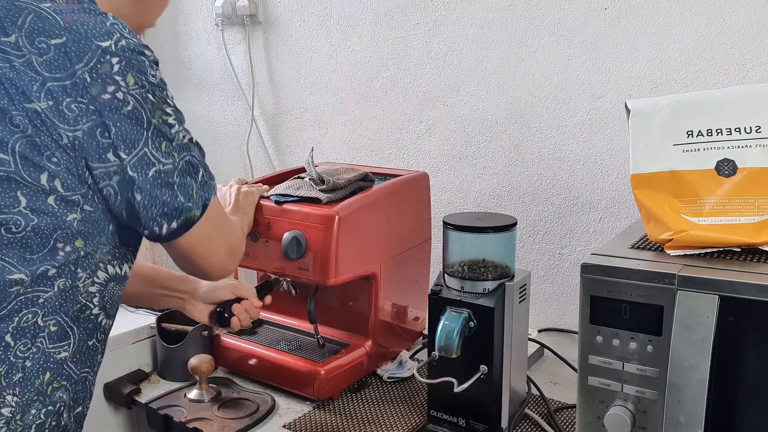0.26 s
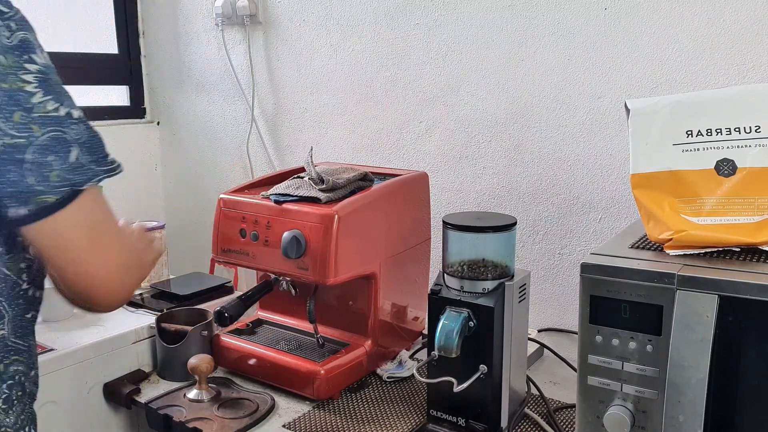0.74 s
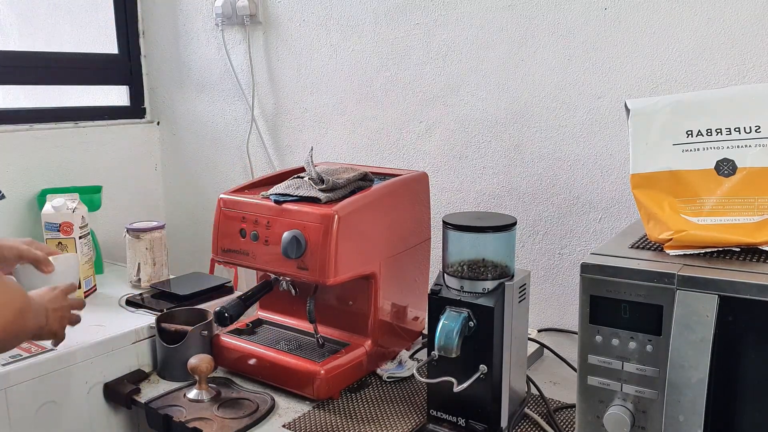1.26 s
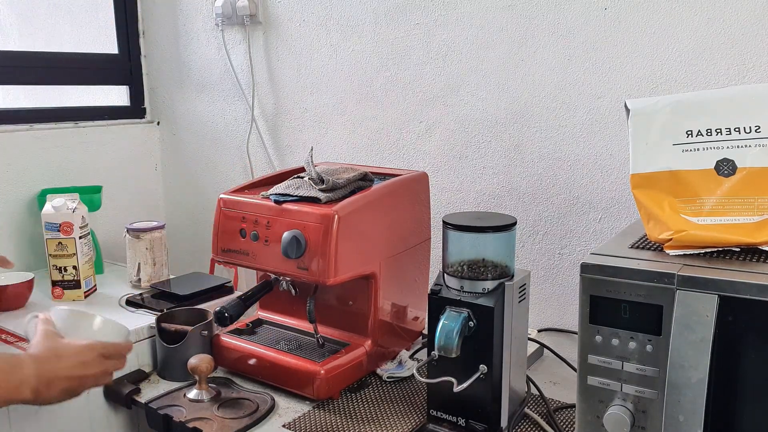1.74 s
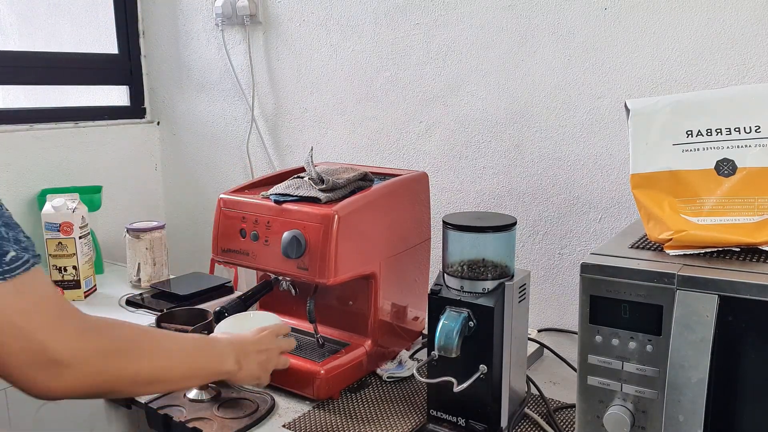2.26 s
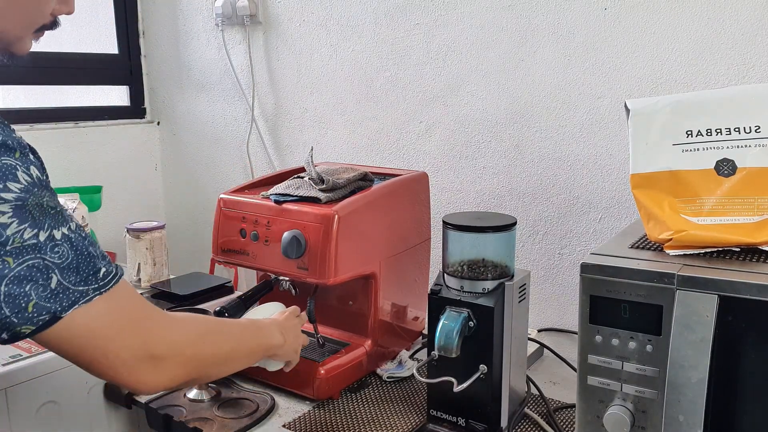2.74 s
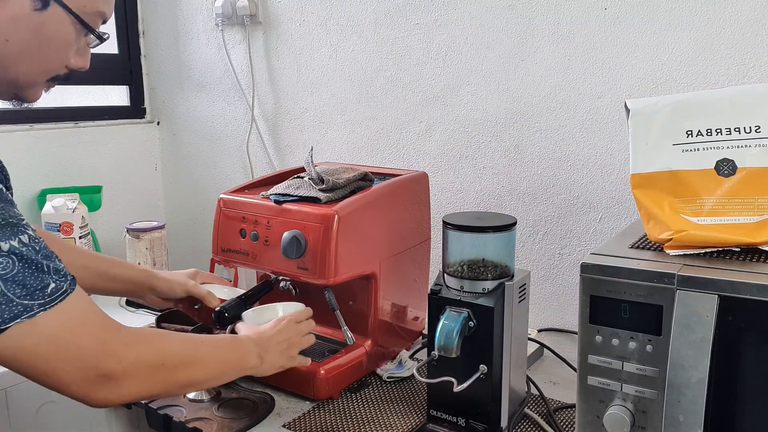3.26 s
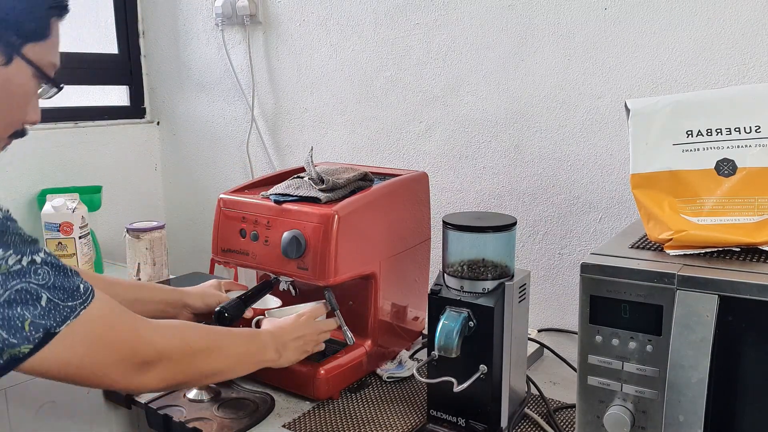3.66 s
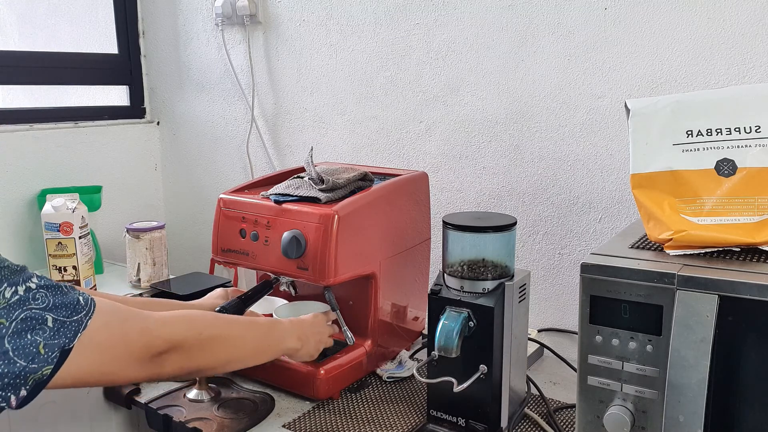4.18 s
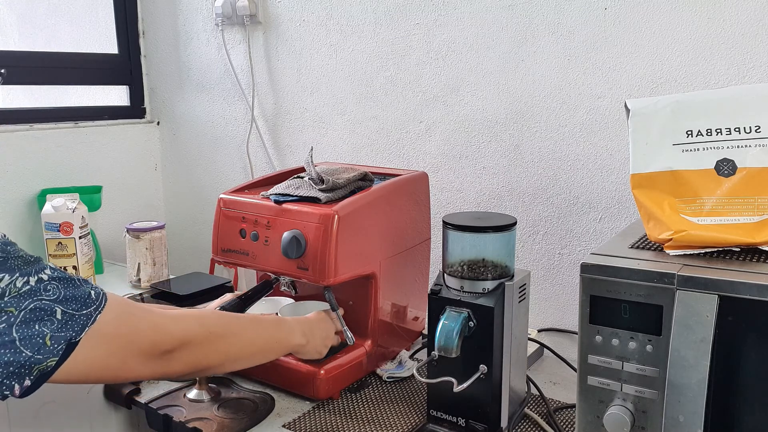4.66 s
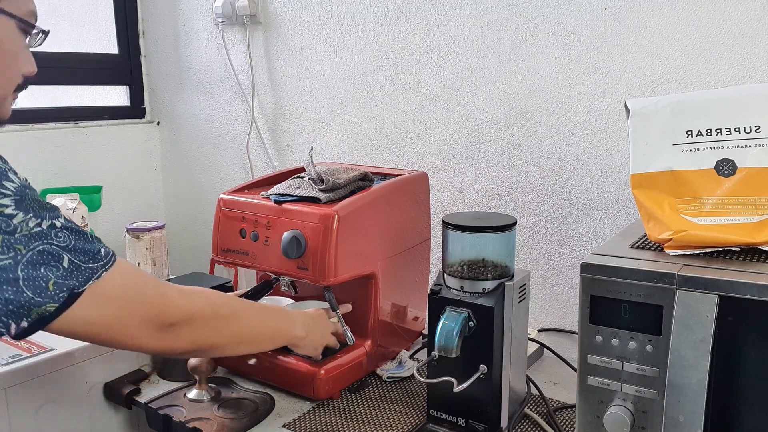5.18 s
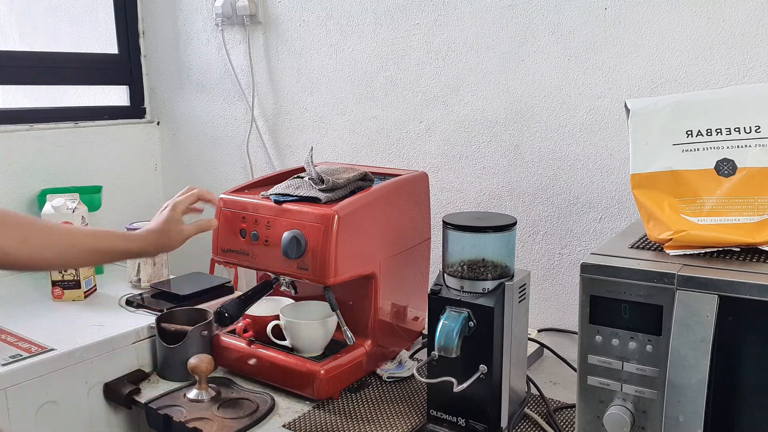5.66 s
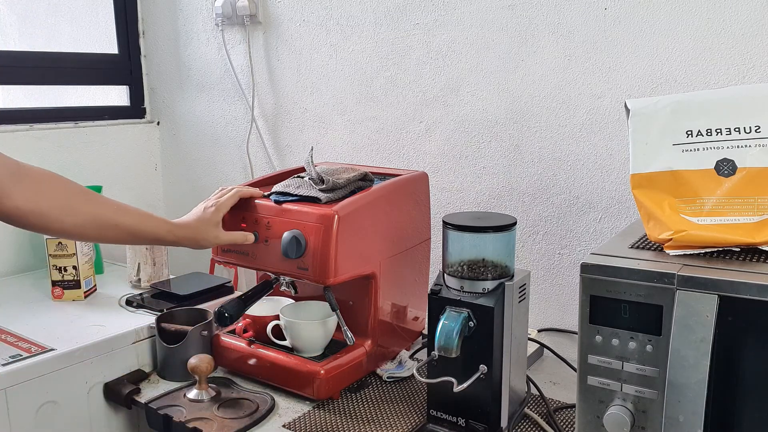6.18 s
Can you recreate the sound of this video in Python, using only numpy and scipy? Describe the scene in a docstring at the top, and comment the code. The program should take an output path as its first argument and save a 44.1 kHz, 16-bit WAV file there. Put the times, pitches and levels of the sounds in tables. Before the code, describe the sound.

A steady low room rumble with a very faint hum fills a small, hard-walled kitchen, heard by close stereo microphones. From 0.2 to 0.7 seconds, quiet dull bumps and short gritty rubs come from a filter holder being twisted tight, mixed with faint sole scrapes. Small shuffles continue around 1.1, 1.8 and 2.2, with a tiny tick near 0.9. Soft thuds at 2.8 to 2.9 precede a longer, hissing shoe slide from 3.2 to 3.5. At 3.5 a strong, hollow double knock lands, followed by lower knocks at 3.6 and 3.75 and gritty ceramic sliding. A bright double cup clink with a thump rings at 4.1. Muffled bumps and slides follow at 4.4, then lighter paired clinks at 4.7 and 5.0, the latter more ringing. Shoes scuff between 5.35 and 5.75; one faint thud at 5.8 leaves quiet rumble.

```python
"""Readying an espresso machine

In a small, hard-walled kitchen the filter holder is twisted tight, feet shuffle, and two ceramic cups
are bumped onto the drip tray, slid into place and clinked in three quick pairs of contacts.
Knocks, clinks and ticks are dying modes and coloured room echoes; slides are gritty noise shaped by
sliding speed; room tone is coloured noise with a faint hum."""
import sys
import numpy as np
from scipy import signal
from scipy.fft import rfft, irfft, next_fast_len
from scipy.io import wavfile
from scipy.ndimage import uniform_filter1d

SR = 44100
rng = np.random.default_rng(int(sys.argv[2]) if len(sys.argv) > 2 else 0)


def persist_wave(psi):
    """Save psi, clipped to +-1, as 16-bit WAV."""
    counts = np.round(np.clip(psi, -1, 1) * 32767).astype(np.int16)
    wavfile.write(sys.argv[1], SR, np.atleast_2d(counts).T)


N = 283111
RING = np.arange(32768) / SR  # time axis of short sounds (s)
LEAD_S = 4 / SR  # sound reaches the left microphone this much earlier


def amp(db):
    """Decibels to gain."""
    return 10 ** (np.asarray(db) / 20)


def unit(x):
    """Scales to an rms of one."""
    return x / np.sqrt(np.mean(x ** 2) + 1e-20)


def blow(x):
    """Scales each channel of a short sound to the energy of a tenth of a second at rms one."""
    return x / np.sqrt(np.sum(x ** 2, -1, keepdims=True) * 10 / SR + 1e-20)


def read(points, hz):
    """Joins points by straight lines on a log-frequency axis."""
    point_hz, value = np.transpose(points)
    return np.interp(np.log(hz + 1), np.log(point_hz), value)


def add(mix, start_s, sound):
    """Mixes a stereo sound in at a given time."""
    part = mix[:, round(start_s * SR):][:, :sound.shape[1]]
    part += sound[:, :part.shape[1]]


def band(x, hz, kind, order=2):
    """Butterworth filter."""
    sos = signal.butter(order, np.minimum(hz, SR / 2 - 100), kind, fs=SR, output="sos")
    return signal.sosfilt(sos, x)


def colour(x, spectrum, patchy_db=0):
    """Minimum-phase filter with the given spectrum, randomly rippled like many small resonances."""
    hz = np.fft.rfftfreq(len(RING), 1 / SR)
    smoother = signal.windows.hann(len(RING) // 320)
    ripple = unit(signal.fftconvolve(rng.standard_normal(len(hz)), smoother, "same"))
    db = read(spectrum, hz) + patchy_db * ripple * np.minimum(hz / 1500, 1)  # smoother in the bass
    log_gain = np.log(amp(np.r_[db, db[-2:0:-1]]))
    response = np.fft.ifft(np.exp(signal.hilbert(log_gain).conj())).real
    taps = response[:len(RING) // 8]
    return signal.fftconvolve(x, taps[None], axes=1)[:, :x.shape[1]]


def diffuse(size):
    """Noise from all sides at two close microphones: alike in the bass, nearly unrelated in the treble."""
    # (frequency [Hz], left-right correlation)
    correlation = [(60, 0.93), (150, 1), (300, 0.75), (640, 0.5), (1400, 0), (3000, 0.087), (15000, 0)]
    n = next_fast_len(size)
    mid, side = rfft(rng.standard_normal((2, n)))
    alike = np.clip(read(correlation, np.arange(len(mid)) * SR / n), -1, 1)
    mid = mid * np.sqrt(1 + alike)
    side = side * np.sqrt(1 - alike)
    return unit(irfft([mid + side, mid - side], n)[:, :size])


def room(direct=0.18, late_db=-8.5, early_s=.045):
    """Kitchen impulse response: direct click, plateau of wall echoes, lower tail dying band by band."""
    # reverberation: (frequency [Hz], t60 [s])
    room_t60 = [(150, 0.61), (400, 0.54), (1040, 0.42), (2760, 0.46), (7280, 0.32), (15000, 0.29)]
    hz, t, z = signal.stft(diffuse(len(RING)), SR, nperseg=256)
    late = np.clip(2 * t / early_s - 1, 0, 1)
    decay_db = 60 * np.maximum(t - early_s / 2, 0) / read(room_t60, hz)[:, None]
    tail = signal.istft(z * amp(late * late_db - decay_db), SR)[1][:, :len(RING)]
    tail /= np.linalg.norm(tail[0])
    tail[[0, 1], [0, round(LEAD_S * SR)]] += direct
    return tail


def ring(hz, db, t60, pan_db=0, wet=1):
    """Exponentially dying modes, one row each, heard straight and through the room."""
    hz, db, t60, pan_db = (np.reshape(c, (-1, 1, 1)) for c in (hz, db, t60, pan_db))
    t = np.maximum(RING - [[0], [LEAD_S]], 0)
    modes = np.sin(2 * np.pi * hz * t) * np.exp(-np.log(1000) * t / t60)
    modes[::2] *= -1  # neighbouring modes start in opposite directions
    echoes = signal.fftconvolve(modes[:, :1], room()[None], axes=2)[..., :len(RING)]
    gain = amp(db + pan_db * np.array([[.5], [-.5]]))
    return gain * blow(blow(modes) + wet * blow(echoes))


def friction(grain_db):
    """Noise made uneven by tiny slips about a millisecond long."""
    slips = unit(uniform_filter1d(rng.standard_normal(N), size=50))
    return diffuse(N) * amp(grain_db * slips)


def stroke(start_s, rise_s, glide_s, db, release_t60, speed_power=1.53):
    """Gain of one slide: friction grows as a power of speed; after the stop it dies away in the room."""
    t = np.arange(N) / SR - start_s
    speed = np.sin(np.pi / 2 * np.clip(t / rise_s, 0, 1))
    stopped_s = np.maximum(t - rise_s - glide_s, 0)
    return amp(db) * speed ** speed_power * np.exp(-np.log(1000) * stopped_s / release_t60)


def slides(rows, release_t60):
    """Gain over time of several slides, whose powers add."""
    return np.sqrt(sum(stroke(*row, release_t60) ** 2 for row in rows))


def knocks(thud_db=0, lowest_hz=80, pan_db=-0.6, spot_db=2):
    """Each knock is voiced by the same body and counter modes; softness is a lower treble corner."""
    # blows on the machine, and a foot landing at 3.303, all voiced by the same body and counter modes:
    # (time [s], level [dB], low-pass corner set by hardness [Hz], counter boom [dB])
    knock_rows = [(.178, -47, 2400, -3), (.229, -51.5, 1500, -6.5), (.246, -48, 1700, 2.5),
                  (0.305, -48, 250, -31), (.39, -44, 230, -4), (.56, -51.5, 507, 3.5),
                  (.713, -54.5, 680, -2.5), (2.829, -49, 238, -7), (2.903, -49, 189, -2.5),
                  (3.303, -52.5, 464, -8), (3.502, -27.5, 1680, -7), (3.509, -24, 1110, -10.5),
                  (3.578, -30.5, 517, 2), (3.744, -28.5, 450, 0.5), (3.934, -40.5, 120, -19),
                  (3.997, -38, 180, -17), (4.075, -30, 305, -2.5), (4.366, -45.5, 124, -19),
                  (4.436, -44, 180, -21), (4.467, -47.5, 330, -6.5), (5.821, -55.5, 185, -1)]
    # hollow body of the machine: (frequency [Hz], mean level [dB], t60 [s])
    body_modes = [(172, 4, .17), (190, -1, .13), (245, -10, .12), (302, -16, .1), (381, 0, .1),
                  (471, -2, .1), (560, -7, .09), (667, -10, .1), (833, -3, .12), (893, -8, .1),
                  (1010, -8, .07), (1065, -7, .1), (1243, -15, .1), (1760, -14, .08), (1943, -12, .08)]
    # counter under the machine: (frequency [Hz], relative level [dB], t60 [s])
    counter_modes = [(81, -18, .35), (110, -8, .35), (134, 4, .33)]
    # dense part of a knock: (frequency [Hz], relative density [dB per Hz])
    thud_spectrum = [(50, -26), (140, 4.5), (250, -8), (420, -10.5), (700, 6.5), (950, -8), (1400, -3),
                     (2100, 3.5), (3200, -24), (7000, -40), (15000, -23.5)]
    out = np.zeros((2, N))
    body = ring(*np.transpose(body_modes), wet=0.95)
    counter = ring(*np.transpose(counter_modes), wet=1.4).sum(0)
    spots = rng.standard_normal((len(knock_rows), len(body_modes)))  # each knock favours other modes
    for (start_s, db, hard_hz, boom_db), spot in zip(knock_rows, spots):
        modes = np.tensordot(amp(spot_db * spot), body, 1) + amp(boom_db) * counter
        thud = blow(colour(room(), thud_spectrum, patchy_db=2))
        dulled = band(modes + amp(thud_db) * thud, hard_hz, "low")
        add(out, start_s, amp(db) * blow(band(dulled, lowest_hz, "high", order=3)))
    return out * amp([[pan_db], [-pan_db]])


def clinks(wet=2.4):
    """Ceramic contacts: a crack plus the cup's modes, weighted by where it is touched; close modes beat."""
    # red cup, on cup or steel: (time [s], level of the cup [dB], crack re cup [dB])
    red_clinks = [(4.0805, -24.5, -3.5), (4.101, -37, -1.5)]
    # white cup: (time [s], level of the cup [dB], contact height [0 wall to 1 rim], crack re cup [dB])
    white_clinks = [(4.6875, -34, 0.12, 1), (4.711, -37, 0, 1), (5.0076, -37.5, 0.97, -3.5),
                    (5.027, -39, 1, -14.5)]
    # red cup modes: (frequency [Hz], relative level [dB], t60 [s], left minus right [dB])
    red_cup = [(1476, -12, .13, 8), (1563, -18, .13, 4), (1619, -14, .17, 1), (2710, -4, .1, -1),
               (2916, -7, .12, 3), (3663, -19, .1, 4), (3814, -4, .1, 0), (3866, 1, .15, -3),
               (4075, -16, .15, 0), (4219, -15, .1, 1), (4423, -18, .1, 2), (5216, 0, .09, -1),
               (6379, -12, .12, 7), (6632, -12, .12, -2), (7694, -19, .16, 3), (8236, -23, .1, 10),
               (8334, -22, .16, 8), (10812, -23, .12, 7), (11125, -26, .15, 0), (12420, -20, .14, 0),
               (14125, -22, .17, 3), (15500, -28, .12, 0)]
    # white cup modes: (frequency [Hz], level struck on wall [dB], level struck on rim [dB], t60 [s],
    # left minus right [dB])
    white_cup = [(1485, -13, -11, .18, 4), (1540, -11, -18, .15, -2), (1596, -15, 0, .5, 1),
                 (1605, -16, 3, .15, 1), (2331, -22, -19, .15, 2), (2688, -11, -3, .14, 3),
                 (2783, 0, -5, .17, -2), (3230, -19, -24, .12, 2), (3324, -15, -25, .1, 2),
                 (3842, -11, -4, .3, 0), (3922, 1, -14, .1, 0), (4045, -6, -9, .15, 3),
                 (4312, -16, -22, .15, 3), (5203, -27, -25, .28, 0), (6198, -9, -19, .14, 4),
                 (6645, -9, -13, .13, -1), (7373, -22, -35, .1, 0), (7778, -10, -15, .15, 3),
                 (8334, -22, -22, .17, 6), (9050, -24, -40, .1, 9), (10850, -22, -37, .1, 7),
                 (11860, -28, -28, .13, -2), (12140, -27, -35, .1, 1), (12373, -19, -34, .1, -1)]
    # crack of ceramic contact: (frequency [Hz], relative density [dB per Hz])
    crack_spectrum = [(200, -12), (700, 10), (1100, -6), (1550, 11), (2200, 3.5), (2800, 13.5), (3400, -1),
                      (4100, 15), (5000, -9.5), (6600, -4.5), (8400, -16.5), (9600, -44), (12300, -21),
                      (14000, -48.5)]
    out = np.zeros((2, N))
    for start_s, db, crack_db in red_clinks:
        cup = ring(*np.transpose(red_cup), wet=wet).sum(0)
        crack = blow(colour(room(), crack_spectrum, patchy_db=4.0))
        add(out, start_s, amp(db) * (cup + amp(crack_db) * crack))
    hz, wall_db, rim_db, t60, pan_db = np.transpose(white_cup)
    for start_s, db, height, crack_db in white_clinks:
        mode_db = wall_db + height * (rim_db - wall_db)
        cup = ring(hz, mode_db, t60, pan_db, wet=wet).sum(0)
        crack = blow(colour(room(), crack_spectrum, patchy_db=5))
        add(out, start_s, amp(db) * (cup + amp(crack_db) * crack))
    return out


def rubs(level_db=2):
    """Gritty sliding of metal and ceramic: uneven noise through many resonances, gated by speed."""
    # filter holder in its seat, then cups on the tray:
    # (start [s], speeding up [s], gliding [s], level before level_db [dB])
    rub_strokes = [(.165, 0.0091, 0.047, -50.5), (.355, 0.013, 0.011, -55.5), (.7, 0.011, 0.017, -62),
                   (3.728, .02, .008, -44), (3.79, .03, 0.09, -52), (3.96, 0.02, .015, -46.5),
                   (4.04, 0.039, .003, -37.5), (4.36, 0.017, 0.07, -53.5), (4.425, 0.028, .008, -46)]
    # (frequency [Hz], relative density [dB per Hz])
    rub_spectrum = [(150, -30.5), (250, 4), (327, -19.5), (401, -7), (735, -16), (1060, -9.5), (1390, -23),
                    (2160, -12), (2550, -25.5), (3960, -29.5), (4760, -34), (14000, -57)]
    grit = unit(colour(friction(grain_db=1.0), rub_spectrum, patchy_db=7.0))
    return amp(level_db) * slides(rub_strokes, release_t60=0.4) * grit


def shuffles(hiss_db=-0.24, split_hz=2300):
    """Sliding soles hiss; weight on the foot adds a lower scrape."""
    # (start [s], speeding up [s], gliding [s], hiss level before hiss_db [dB],
    # weight: scrape over that hiss level [dB])
    steps = [(.088, 0.023, .004, -67, 5.5), (.35, 0.017, .008, -60.5, -1), (.52, 0.031, .012, -58, -1.5),
             (.775, 0.035, 0.084, -67, -18), (1.062, 0.049, 0.0064, -55.5, 5.5),
             (1.84, 0.079, 0.067, -57.5, -14), (2.045, 0.043, 0.02, -72, 16), (2.21, 0.044, 0.043, -58, 6),
             (3.185, 0.17, .16, -33, -13), (5.34, 0.056, 0.051, -66, -6), (5.47, 0.041, .05, -61, -6),
             (5.565, 0.041, .03, -49.5, -13), (5.637, 0.074, 0.0039, -38.5, -11.5)]
    # sole on floor: (frequency [Hz], relative density [dB per Hz])
    sole_spectrum = [(240, -58), (400, -16.5), (561, -11.5), (615, 0.5), (752, -9), (1160, -7),
                     (1390, -3.5), (1720, -5), (1980, 0.5), (2170, -3.5), (5550, -1.5), (7550, -6.5),
                     (8810, -18), (12000, -11.5), (15800, -22)]
    grit = colour(friction(grain_db=1.0), sole_spectrum, patchy_db=4.5)
    light = [(start_s, rise_s, glide_s, db) for start_s, rise_s, glide_s, db, _ in steps]
    heavy = [(start_s, rise_s, glide_s, db + weight_db)
             for start_s, rise_s, glide_s, db, weight_db in steps]
    hiss = slides(light, release_t60=0.31) * unit(band(grit, split_hz, "high", order=4))
    scrape = slides(heavy, release_t60=0.3) * unit(band(grit, split_hz, "low", order=4))
    return amp(hiss_db) * hiss + scrape


def ticks(ping_db=-3, ping_t60=.04):
    """Light touches of small hard things: a coloured click and a short two-mode ping, with echoes."""
    # (time [s], level [dB], centre frequency [Hz])
    touches = [(.922, -56, 4860), (3.742, -57.5, 4483), (4.074, -45.5, 2300)]
    out = np.zeros((2, N))
    for start_s, db, hz in touches:
        spectrum = [(hz / 4, -30), (hz / 1.5, -3), (hz * 1.25, 0), (hz * 3, -45)]
        touch = colour(room(direct=1.4), spectrum, patchy_db=4)
        ping = ring([hz * .78, hz * 1.2], [-9, 0], [ping_t60] * 2, wet=.5).sum(0)
        add(out, start_s, amp(db) * blow(blow(touch) + amp(ping_db) * blow(ping)))
    return out


def room_tone(air_db=-53.5):
    """Low, steady rumble of the house: coloured diffuse noise, with a faint appliance hum of pure tones."""
    # rumble: (frequency [Hz], relative density [dB per Hz])
    air_spectrum = [(12, -40), (20, -5.5), (145, -3.5), (221, -12.5), (335, -11.5), (365, -23.5),
                    (431, -13.5), (733, -23), (1890, -30), (2370, -35), (2720, -35.5), (3600, -39),
                    (7650, -43.5), (8790, -51.5), (15800, -44.5)]
    # appliance hum: (frequency [Hz], rms level [dB])
    hum_tones = [(108, -78.5), (134, -67)]
    t = np.arange(N) / SR
    hum = sum(np.sqrt(2) * amp(db) * np.sin(2 * np.pi * (hz * t + rng.random())) for hz, db in hum_tones)
    air = colour(diffuse(N + len(RING)), air_spectrum)[:, -N:]  # the filter's onset is cut off
    return amp(air_db) * unit(air) + hum


def scene():
    """All sources at the two microphones."""
    return knocks() + clinks() + rubs() + shuffles() + ticks() + room_tone()


def record(dry, edge_hz=15850):
    """The recorder's band limit: a steep linear-phase low-pass."""
    taps = signal.firwin(511, edge_hz, window=("kaiser", 9), fs=SR)
    return signal.oaconvolve(dry, taps[None], "same")


dry = scene()
out = record(dry)
persist_wave(out)
```